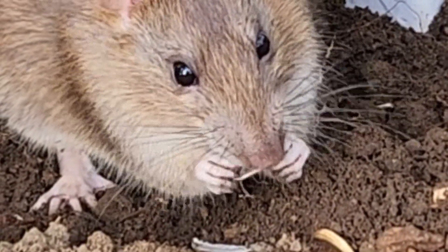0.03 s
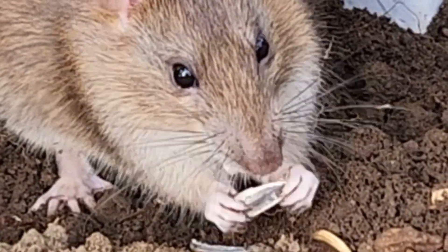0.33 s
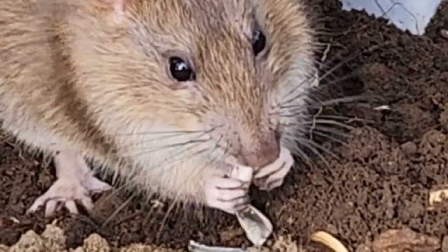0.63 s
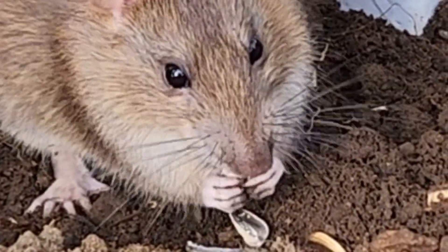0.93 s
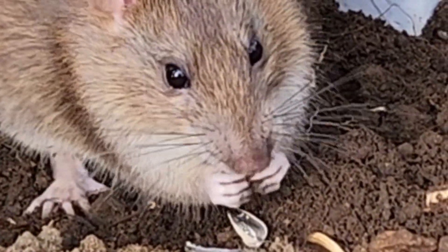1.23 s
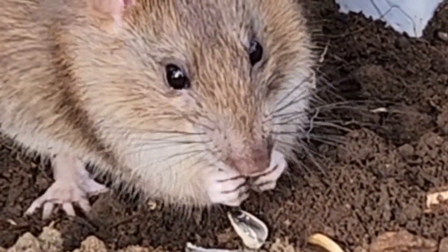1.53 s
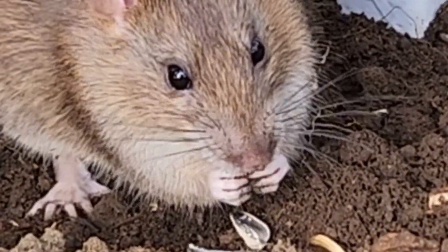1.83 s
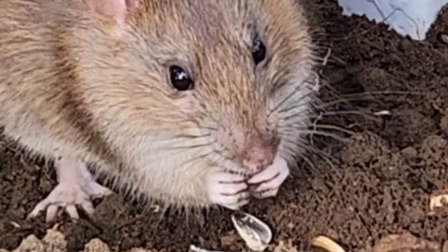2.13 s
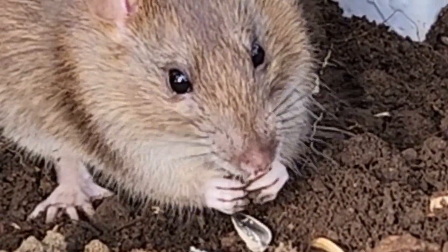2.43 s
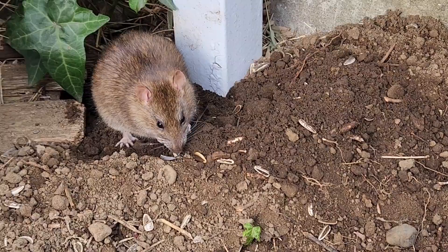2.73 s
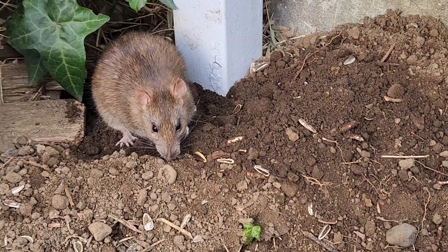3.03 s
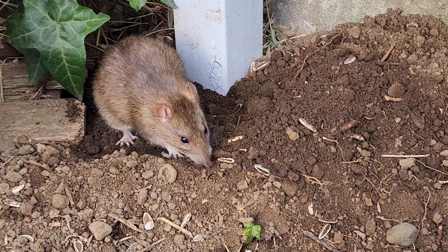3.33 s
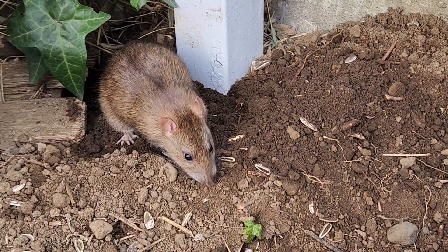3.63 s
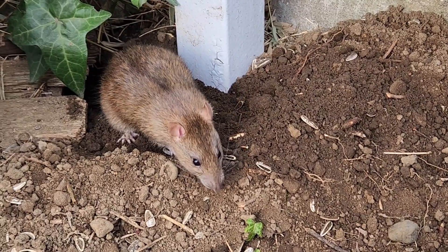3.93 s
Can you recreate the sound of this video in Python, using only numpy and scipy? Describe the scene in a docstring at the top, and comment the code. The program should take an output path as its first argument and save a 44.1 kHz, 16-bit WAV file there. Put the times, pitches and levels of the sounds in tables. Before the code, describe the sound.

Sharp little cracks of a rat biting a seed husk, over faint distant traffic.

```python
"""Sharp snaps of a sunflower husk, close to the microphones: a rat is cracking a seed in a yard.
Each bite sets off a spray of tiny fractures that ring husk and jaws, and its teeth tick on the kernel.
Far traffic rumbles under a faint machine hum, with two thin whistles and a few distant knocks and taps.
The background drops abruptly with a click and stays quieter; then the rat noses the soil with a rustle."""
import sys
import numpy as np
from scipy import signal
from scipy.fft import rfft, irfft
from scipy.io import wavfile

SR = 44100
rng = np.random.default_rng(int(sys.argv[2]) if len(sys.argv) > 2 else 0)


def digitize_waveform(pressure):
    """Quantize a signal to 16-bit integers and store it at the path in sys.argv[1].

    Rows of a 2-D input are taken as channels; values are limited to [-1, 1].
    """
    field = np.atleast_2d(pressure).T
    bounded = np.clip(field, -1, 1)
    quanta = np.round(bounded * 32767).astype(np.int16)
    wavfile.write(sys.argv[1], SR, quanta)


N = 176400
T = np.arange(N) / SR
BIN_HZ = np.arange(N // 2 + 1) * SR / N
STRAIN_S = .006  # the creak before each break
YARD_T60_S, FAR_T60_S = 0.41, 0.86  # echo of near and of far sounds


def from_db(db):
    """Decibels to gain."""
    return 10 ** (np.asarray(db) / 20)


def unit_rms(x):
    """Scale to rms 1."""
    return x / np.sqrt(np.mean(x ** 2) + 1e-30)


def pan(db):
    """Constant-power gains, the left microphone db above the right."""
    return unit_rms(from_db([[db / 2], [-db / 2]]))


def at_hz(points, hz):
    """Read a table on a log-frequency axis."""
    pitches, values = np.transpose(points)
    return np.interp(np.log(np.maximum(hz, 1)), np.log(pitches), values)


def add(out, break_s, sound):
    """Mix a burst in so that its break falls at break_s."""
    start = int((break_s - STRAIN_S) * SR)
    sound = sound[:, max(0, -start):]
    start = max(0, start)
    out[:, start:start + sound.shape[1]] += sound[:, :N - start]


def resonate(x, hz, width_hz):
    """One broad resonance."""
    edges = np.clip([hz - width_hz / 2, hz + width_hz / 2], 20, .48 * SR)
    return signal.sosfilt(signal.butter(2, edges, "band", fs=SR, output="sos"), x + 1e-18)


def burst(decay_s, modes, first_break, grain_s=.0004, grit_db=4.5):
    """A brief strain, an optional first break and a dying spray of uneven fractures ring the modes."""
    t = T[:SR // 5]
    age = t - STRAIN_S
    strain = from_db(-15) * np.exp(-abs(age) / .002)
    soil_scatter = from_db(-16) * np.exp(-abs(age) / .007)
    dying = np.exp(-abs(age) / decay_s) + soil_scatter
    grains = np.clip(rng.standard_normal(len(t)), -2, 2)[(t / grain_s).astype(int)]
    envelope = np.where(age < 0, strain, dying) * from_db(grit_db * grains)
    spray = rng.standard_normal((2, len(t))) * envelope
    spray[:, int(STRAIN_S * SR)] += first_break
    out = 0
    for hz, width_hz, db, pan_db in modes:
        ring = resonate(spray, hz, width_hz)
        energy = width_hz / 500  # wider modes carry more
        ring *= np.sqrt(energy / np.sum(ring ** 2, axis=1, keepdims=True))
        out = out + ring * from_db(db) * pan(pan_db)
    return out


def yard_echo(x, echo_db, t60_s, treble_t60_s=0.27):
    """Diffuse reflections from fence and walls; the treble dies sooner."""
    t = T[:SR // 2]
    noise = rng.standard_normal((2, len(t)))
    low = signal.sosfiltfilt(signal.butter(2, 7000, fs=SR, output="sos"), noise)
    tail = low * from_db(-60 * t / t60_s) + (noise - low) * from_db(-60 * t / treble_t60_s)
    tail *= 1 - np.exp(-t / 0.0076)  # reflections build up
    tail *= from_db(echo_db) / np.sqrt(np.sum(tail ** 2, axis=1, keepdims=True))
    return signal.fftconvolve(x, tail, axes=1)


def echoing_burst(decay_s, modes, echo_db, t60_s, first_break=0):
    """A burst and its echo, which arrives from all directions and so blurs the resonances."""
    blurred = []
    for hz, width_hz, db, pan_db in modes:
        wide_hz = width_hz + min(.22 * hz, 1190)
        blurred.append((hz, wide_hz, db - 10 * np.log10(wide_hz / width_hz), pan_db * 0.71))
    out = yard_echo(burst(decay_s, blurred, first_break), echo_db, t60_s)
    direct = burst(decay_s, modes, first_break)
    out[:, :direct.shape[1]] += direct
    return out


# Bites close to the microphones. Each row: start in seconds, decay in seconds, echo in dB,
# then levels in dB of the knock, clack, snap, crack, tick and splinter ranges.
BITES = [(0.0002, 0.0058, -27, -33.5, -33, -30.5, -19.5, -24, -9.5),
         (0.025, 0.024, -25, -59.5, -44, -38, -36, -38, -35),
         (0.0410, 0.008, -24, -60, -52, -53, -43, -47, -35),
         (0.1383, 0.003, -11, -62, -67, -66, -68.5, -41.5, -35.5),
         (0.161, 0.0048, -14, -62, -73, -71, -62, -48, -45),
         (0.27, 0.0014, -5, -43, -38, -36, -49, -34, -36), (0.28, 0.028, -11, -60, -58, -55, -43, -42, -45),
         (0.3034, 0.002, -22, -38, -55, -59, -56, -23, -22.5),
         (0.3059, 0.0028, -10, -29.5, -49, -44, -32.5, -30, -28.5),
         (0.9484, 0.002, -10.5, -19, -23, -21.5, -23, -30.5, -34),
         (0.9765, .005, -7, -59, -60, -55, -55, -48, -45),
         (0.993, 0.0027, -5, -56, -51, -38, -49, -42, -45.5),
         (1.169, 0.0025, -8.5, -19, -32.5, -48, -24, -27.5, -42),
         (1.53, .002, -11, -65, -61, -41.5, -59, -57, -47.5),
         (1.637, 0.004, -18.5, -62, -58.5, -50, -48, -54, -45.5),
         (1.6546, 0.0023, -8, -25, -42, -25.5, -31, -30, -33.5)]
# The centres of those six ranges in Hz.
RANGE_CENTRES_HZ = [1500, 2950, 3750, 5800, 8200, 13500]
# Husk and jaws. Each row: pitch in Hz, width in Hz, gain in dB, left over right in dB.
HUSK_MODES = [(674, 420, -8, -1), (1060, 330, 1.5, 2), (1500, 450, 1.5, 5.5), (2920, 340, 5.5, -7.5),
              (3690, 420, 6, -7), (5090, 1100, 4, -3.5), (6210, 260, 3.5, -0.5), (7700, 530, 3.5, 1.5),
              (8540, 580, -1, 2), (10300, 430, -5.5, 3), (11760, 1300, 1, 1), (13000, 1000, 4, 10),
              (14500, 1700, 1, 6.5)]


def husk_cracks():
    """Each bite splits the husk and weights its resonances differently."""
    out = np.zeros((2, N))
    for start_s, decay_s, echo_db, *levels in BITES:
        colour = list(zip(RANGE_CENTRES_HZ, levels))
        modes = [(hz, width, db + at_hz(colour, hz), pan_db) for hz, width, db, pan_db in HUSK_MODES]
        add(out, start_s, echoing_burst(decay_s, modes, echo_db, YARD_T60_S, first_break=7.3))
    return out


# How alike the two microphones hear the background. Each row: frequency in Hz, correlation.
MIC_CORRELATION = [(40, 0.95), (110, 1), (250, 0.77), (500, 0.52), (1000, 0), (3000, 0), (12000, 0)]


def ambient_noise(spectrum):
    """Stereo noise of a given spectrum, alike in the bass and diffuse above; rms 1."""
    mid, side = rfft(rng.standard_normal((2, N)))
    alike = at_hz(MIC_CORRELATION, BIN_HZ)
    in_band = (BIN_HZ > spectrum[0][0]) & (BIN_HZ < spectrum[-1][0])
    pair = np.sqrt(1 + alike) * mid + np.sqrt(1 - alike) * side * [[1], [-1]]
    return unit_rms(irfft(pair * from_db(at_hz(spectrum, BIN_HZ)) * in_band, N))


# Far traffic and the open air of the yard. Each row: frequency in Hz, relative density in dB.
RUMBLE_SPECTRUM = [(13, -53), (22, -17), (54, 1), (85, 0), (113, -5.5), (167, -20), (205, -21),
                   (236, -29.5), (350, -38), (460, -68.5), (770, -120)]
AIR_SPECTRUM = [(180, -30.5), (300, -3), (372, -7.5), (404, -1.5), (431, -11), (543, -13), (590, -12),
                (641, -13.5), (781, -6), (849, -11), (985, -9), (1140, -17.5), (1560, -15.5), (1700, -21),
                (1810, -15.5), (2140, -20), (2280, -20), (2520, -26.5), (3020, -25), (5050, -32.5),
                (6790, -41.5), (7500, -35.5), (9760, -47.5), (11700, -38.5), (15200, -39.5), (15800, -43.5)]
# The traffic's swell. Each row: time in seconds, gain in dB.
TRAFFIC_SWELL = [(0, -6), (0.7, -1.5), (1.5, -0.5), (2.2, -0.5), (2.7, -2)]


def traffic_and_air():
    """Far traffic rumbles; tyre noise in the air's middle range partly follows its swell."""
    swell_db = np.interp(T, *np.transpose(TRAFFIC_SWELL))
    rumble = from_db(-26 + swell_db) * ambient_noise(RUMBLE_SPECTRUM) * pan(0.35)
    air = ambient_noise(AIR_SPECTRUM)
    tyre_change = (from_db(0.64 * swell_db) - 1) * resonate(air, hz=1080, width_hz=1500)
    return rumble + from_db(-53) * (air + tyre_change)


def wavering_tone(hz, width_hz):
    """A narrow line that wavers on its way through the air; rms 1."""
    offset = (BIN_HZ - hz) / (width_hz / 2)
    return unit_rms(irfft(rfft(rng.standard_normal((2, N))) / (1 + offset ** 2), N))


# A machine far from the yard. Each row: pitch in Hz, level before the drop in dB.
HUM_LINES = [(399, -64.5), (601, -77), (802, -67.5), (963.6, -67.5), (1095, -77.5), (1314, -83.5),
             (1588, -71), (1787, -78.5), (2250, -73.5)]


def machine_hum():
    """A far machine hums in faint, wavering lines."""
    return sum(from_db(db) * wavering_tone(hz, width_hz=6.1) for hz, db in HUM_LINES)


# Whistles in the distance. Each row: start, attack and decay in seconds, pitch and width in Hz,
# level at the crest in dB.
FAR_WHISTLES = [(-.05, 0.055, 0.35, 2234, 170, -62.5), (2.34, 0.076, 0.16, 3406, 130, -61.5)]


def whistles():
    """Thin whistles swell and fade."""
    out = 0
    for start_s, attack_s, decay_s, hz, width_hz, db in FAR_WHISTLES:
        age = T - start_s
        envelope = np.clip(age / attack_s, 0, 1) * np.exp(-np.maximum(age - attack_s, 0) / decay_s)
        out = out + from_db(db) * envelope * wavering_tone(hz, width_hz)
    return out


# Nibbles close by. Each row: start in seconds, level in dB, pitch in Hz, decay in seconds.
NIBBLES = [(0.5935, -31, 5460, .0025), (0.5940, -26, 5960, .0025), (0.5945, -42, 3670, .0015),
           (1.272, -33, 3070, .005), (1.5303, -32, 3610, .003), (2.1, -45.5, 7170, .005),
           (2.7660, -50, 3750, 0.0037)]


def tooth_ticks():
    """Teeth tick lightly on the kernel, each tick ringing one resonance."""
    out = np.zeros((2, N))
    for start_s, db, hz, decay_s in NIBBLES:
        mode = (hz, 510, db, -3.5)  # 510 Hz wide, louder on the right
        add(out, start_s, echoing_burst(decay_s, [mode], echo_db=-13.5, t60_s=YARD_T60_S))
    return out


def contacts(events, modes, echo_db, t60_s):
    """Soft, rough contacts on one object."""
    out = np.zeros((2, N))
    for start_s, db, decay_s in events:
        add(out, start_s, from_db(db) * echoing_burst(decay_s, modes, echo_db, t60_s))
    return out


# Knocks further off. Each row: start in seconds, gain in dB, decay in seconds.
FAR_KNOCKS = [(0.7480, -22, 0.0013), (0.7525, -14.5, 0.0064), (2.2050, -26, 0.042)]
# The knocked object. Each row: pitch in Hz, width in Hz, gain in dB, left over right in dB.
KNOCK_RESONANCES = [(1037, 194, 7.5, 6), (1290, 170, 4.5, 0.5), (1840, 350, -7, 1.5),
                    (2840, 340, -18.5, -9.5)]


def knocks():
    """Dull knocks reach the microphones with a long echo."""
    return contacts(FAR_KNOCKS, KNOCK_RESONANCES, echo_db=-5.5, t60_s=FAR_T60_S)


# Taps further off. Each row: start in seconds, gain in dB, decay in seconds.
FAR_TAPS = [(2.2120, -43, .016), (2.2605, -32, 0.013), (2.3200, -52, 0.012)]
# The tapped object. Each row: pitch in Hz, width in Hz, gain in dB, left over right in dB.
TAP_RESONANCES = [(1100, 200, 10.5, -2.5), (2880, 340, 11, 0), (3700, 500, -3.5, -11.5),
                  (4430, 750, -3, -2)]


def taps():
    """Lighter contacts ring brighter resonances."""
    return contacts(FAR_TAPS, TAP_RESONANCES, echo_db=-8.5, t60_s=FAR_T60_S)


# Far traffic and yard air after the drop. Each row: frequency in Hz, relative density in dB.
QUIET_RUMBLE = [(13, -60.5), (22, -23), (43, -10.5), (64, -4), (80, -4), (94, -7), (118, -18.5),
                (161, -24.5), (350, -46), (460, -81.5), (770, -120)]
QUIET_AIR = [(180, -39.5), (300, -5), (337, -3), (366, -11.5), (404, -2), (500, -14.5), (744, -10.5),
             (781, -7.5), (849, -15.5), (937, -8.5), (1120, -15.5), (1640, -16), (1870, -18), (2040, -16.5),
             (2300, -23.5), (2550, -28), (3100, -25.5), (5950, -38), (6800, -44), (7500, -38), (9900, -48),
             (11600, -40), (15600, -42)]


def dropping_background(drop_s=2.7098, fall_s=0.0015):
    """Traffic, air, hum and whistles give way, with a click, to quieter rumble, air and hum."""
    hum = machine_hum()
    loud = traffic_and_air() + hum + whistles()
    quiet = from_db(-37.5) * ambient_noise(QUIET_RUMBLE) * pan(0.35)
    quiet += from_db(-65.5) * ambient_noise(QUIET_AIR) + from_db(-13.5) * hum
    before = np.clip((drop_s - T) / fall_s, 0, 1)
    click = from_db(-23.5) * np.exp(-abs(T - drop_s) / fall_s) * (T < drop_s)
    return before * loud + (1 - before) * quiet + click


# Nudges on the ground close by. Each row: start in seconds, gain in dB, decay in seconds.
SNOUT_NUDGES = [(3.4400, -50, .012), (3.4665, -42.5, .004), (3.4738, -33, 0.0057), (3.4850, -40.5, 0.0054),
                (3.4950, -38.5, .005), (3.5070, -42, .010)]
# Loose soil. Each row: pitch in Hz, width in Hz, gain in dB, left over right in dB.
SOIL_RESONANCES = [(1190, 320, 0, -7), (3150, 330, -2, 0.5), (3650, 320, 2.5, -2.5), (5000, 1100, -11, -8),
                   (7450, 550, -18.5, 3.5)]


def soil_rustle():
    """The snout stirs husks and crumbs."""
    return contacts(SNOUT_NUDGES, SOIL_RESONANCES, echo_db=-11.5, t60_s=YARD_T60_S)


def scene(right_lag_s=.00012):
    """The rat close by, knocks and taps further off, the background all round."""
    rat = husk_cracks() + tooth_ticks() + soil_rustle()
    rat[1] = np.pad(rat[1], (int(right_lag_s * SR), 0))[:N]  # the left microphone is nearer
    return rat + knocks() + taps() + dropping_background()


def record(dry):
    """The top is cut steeply above 15.9 kHz."""
    return signal.sosfilt(signal.ellip(10, .1, 80, 15900, fs=SR, output="sos"), dry)


dry = scene()
out = record(dry)
digitize_waveform(out)
```